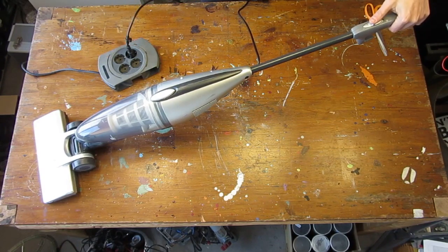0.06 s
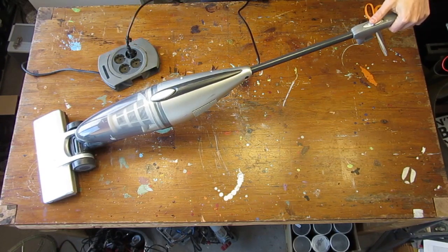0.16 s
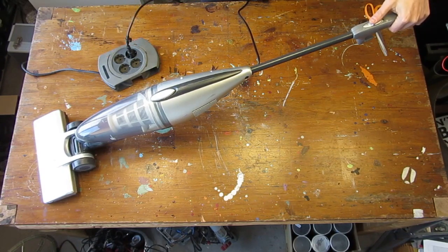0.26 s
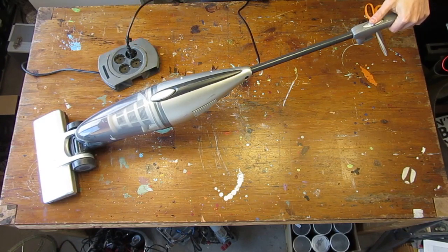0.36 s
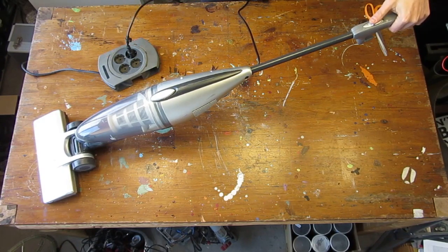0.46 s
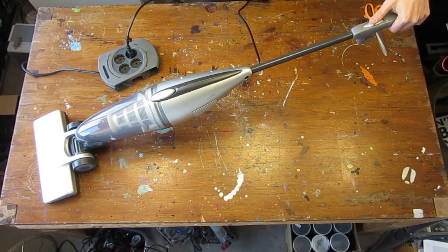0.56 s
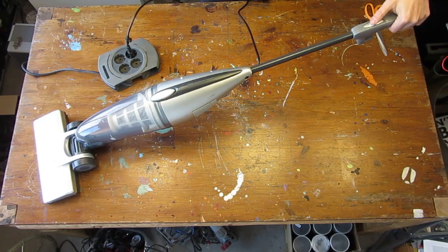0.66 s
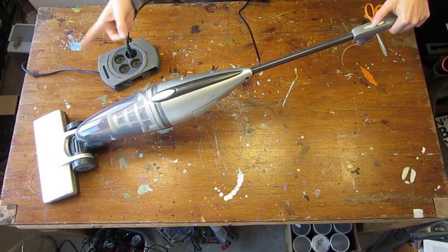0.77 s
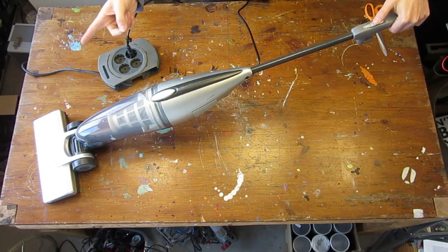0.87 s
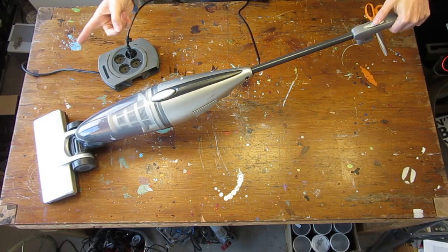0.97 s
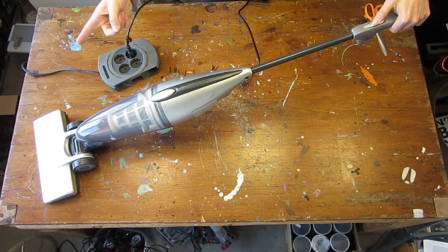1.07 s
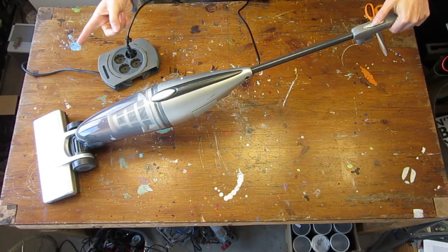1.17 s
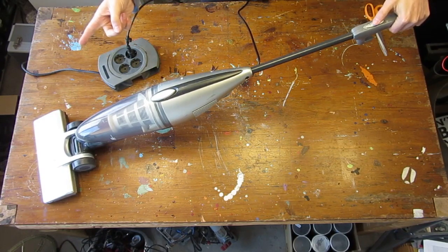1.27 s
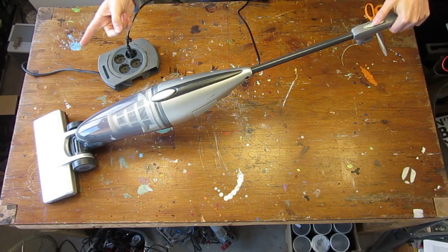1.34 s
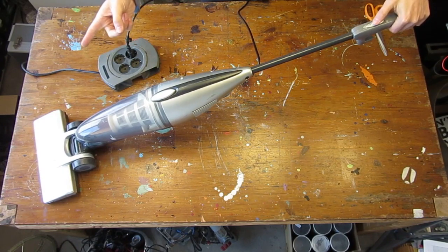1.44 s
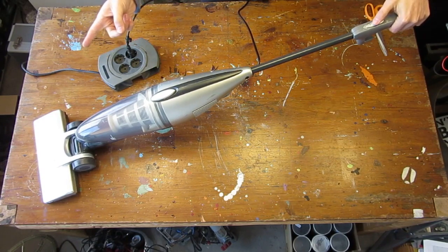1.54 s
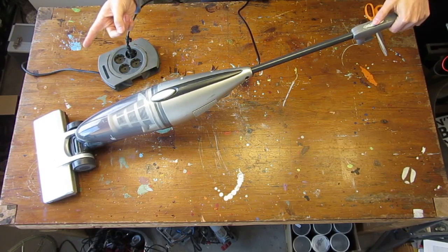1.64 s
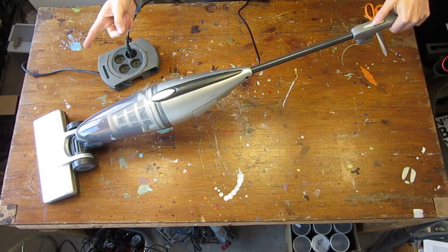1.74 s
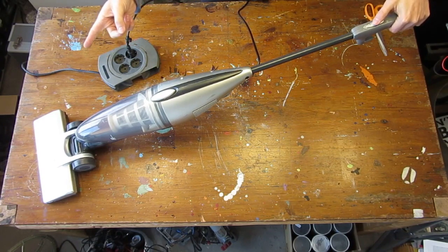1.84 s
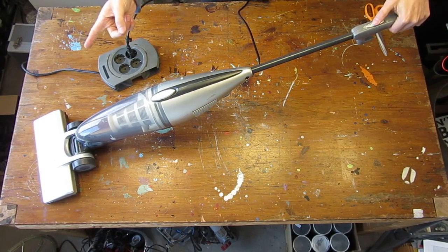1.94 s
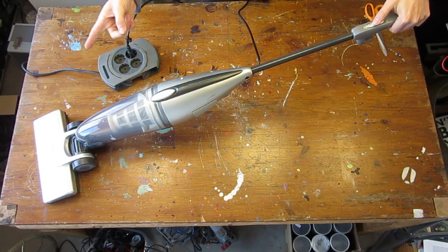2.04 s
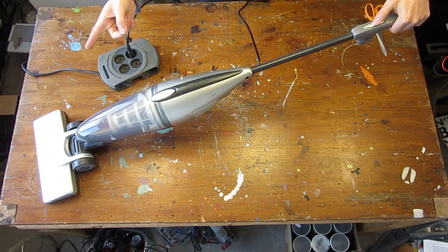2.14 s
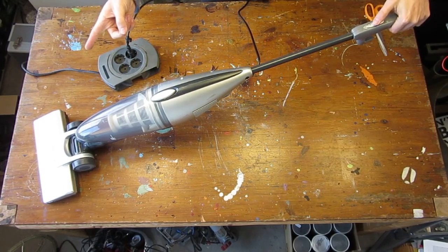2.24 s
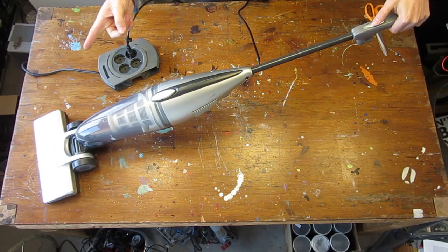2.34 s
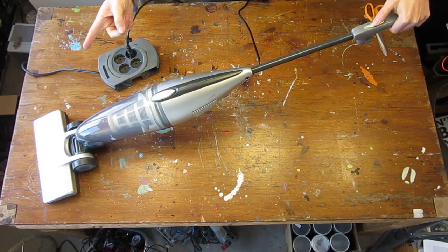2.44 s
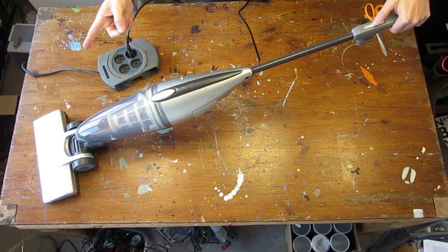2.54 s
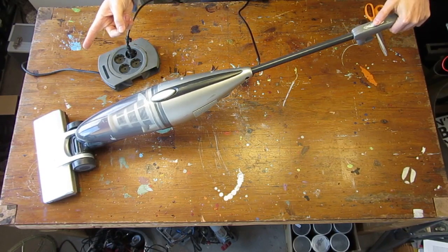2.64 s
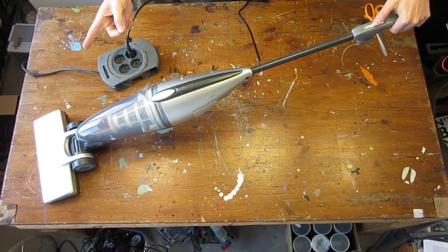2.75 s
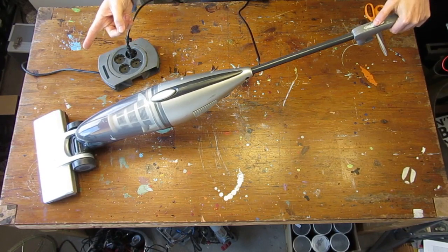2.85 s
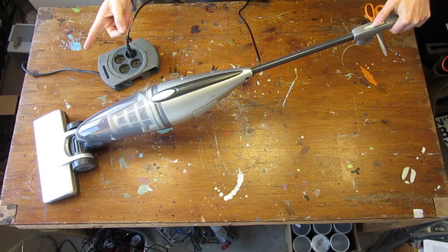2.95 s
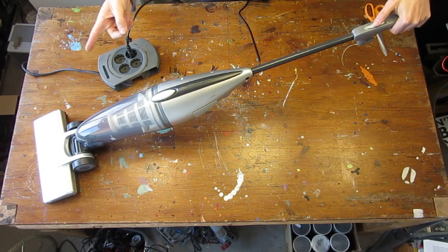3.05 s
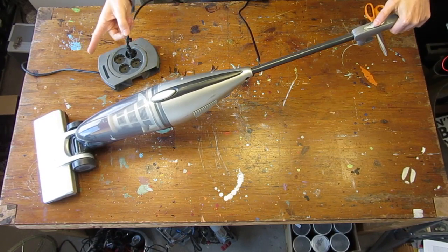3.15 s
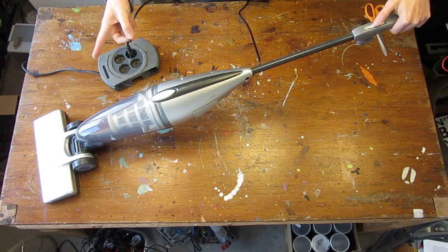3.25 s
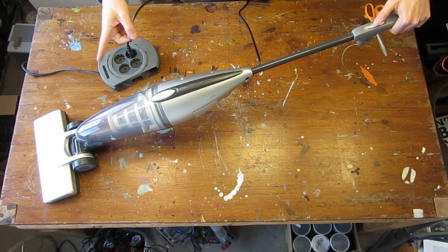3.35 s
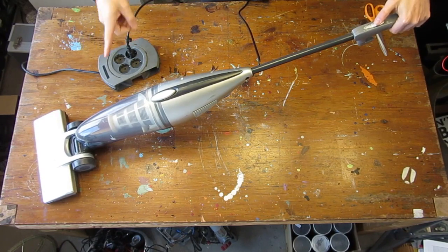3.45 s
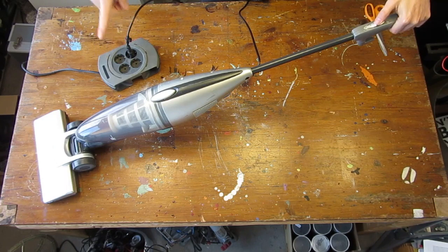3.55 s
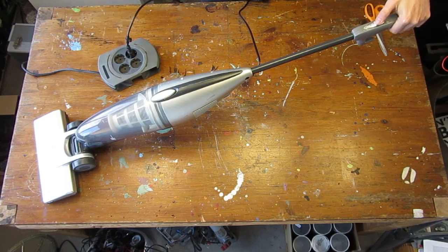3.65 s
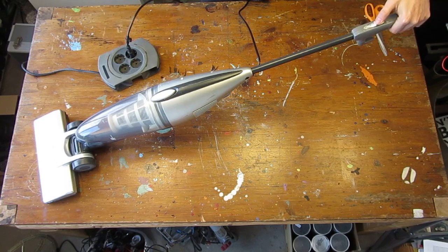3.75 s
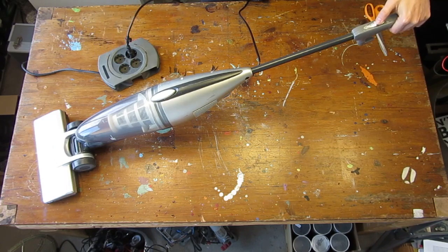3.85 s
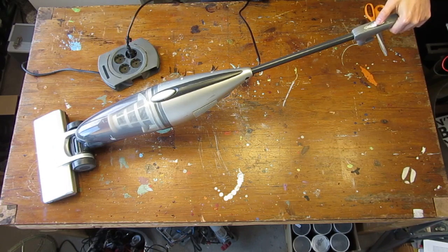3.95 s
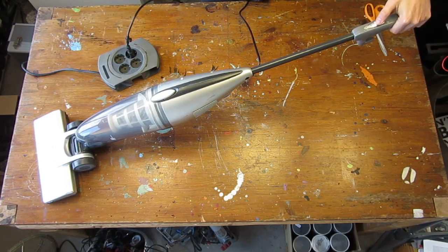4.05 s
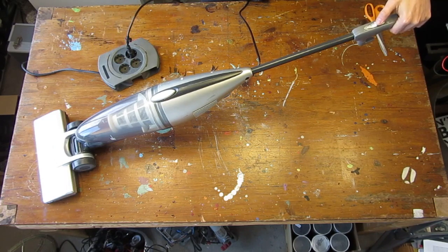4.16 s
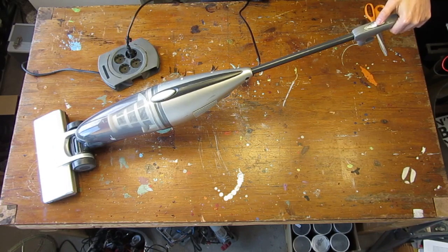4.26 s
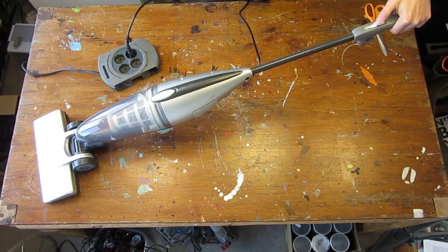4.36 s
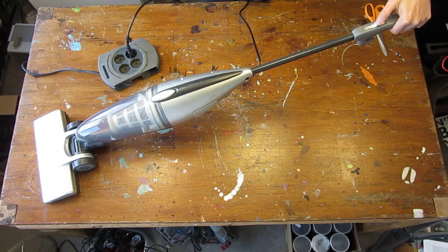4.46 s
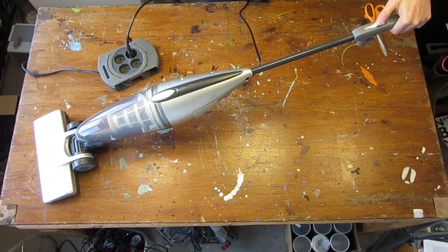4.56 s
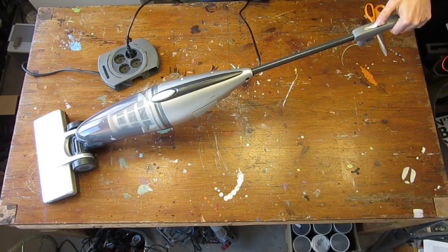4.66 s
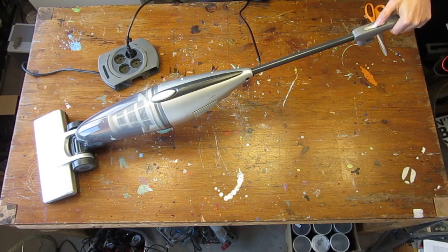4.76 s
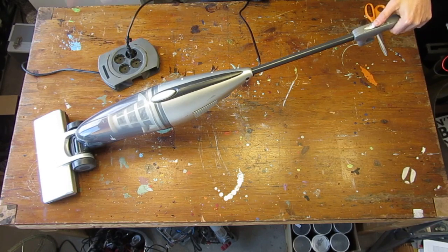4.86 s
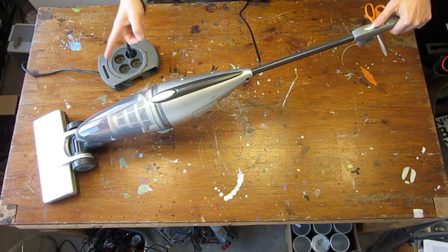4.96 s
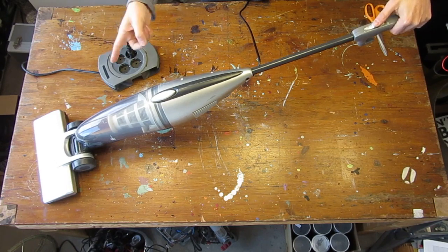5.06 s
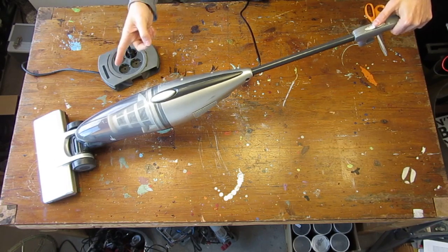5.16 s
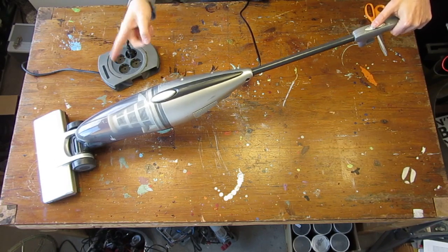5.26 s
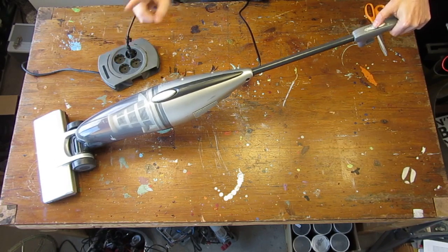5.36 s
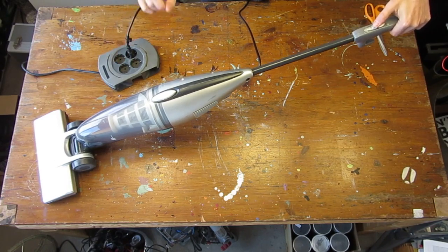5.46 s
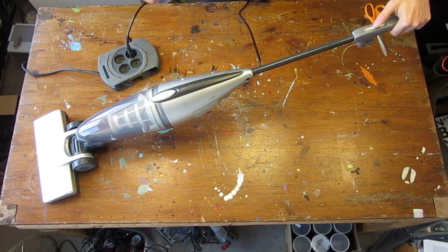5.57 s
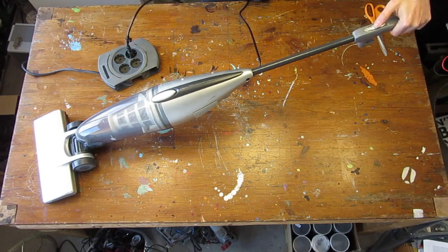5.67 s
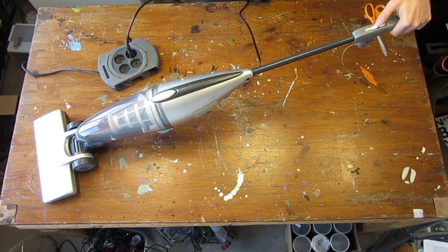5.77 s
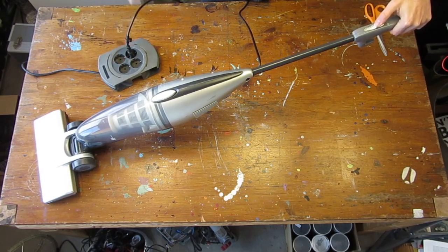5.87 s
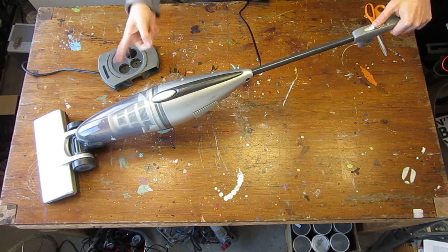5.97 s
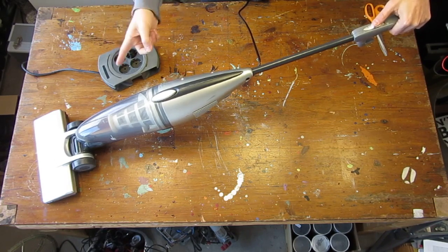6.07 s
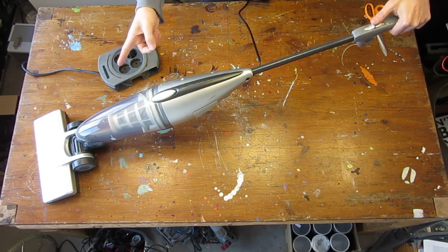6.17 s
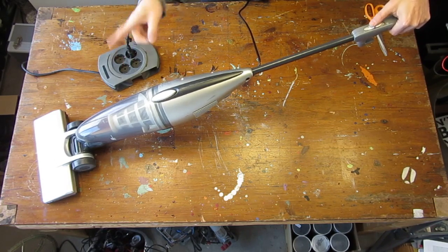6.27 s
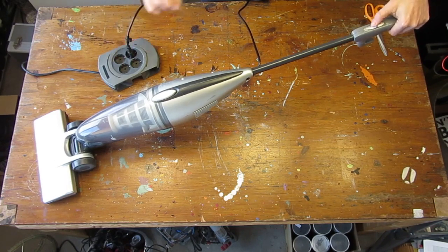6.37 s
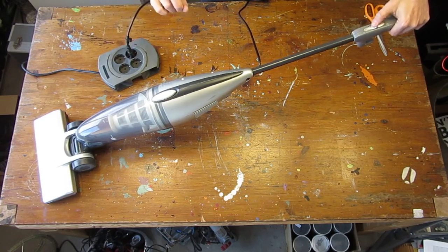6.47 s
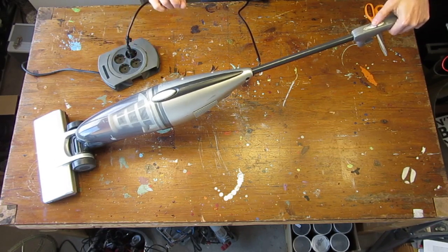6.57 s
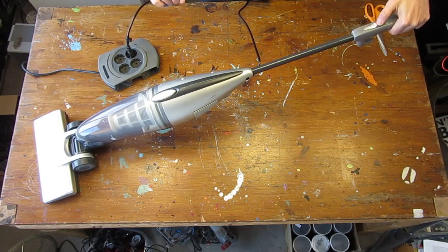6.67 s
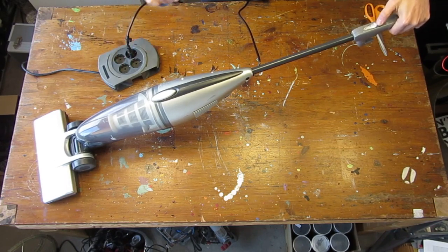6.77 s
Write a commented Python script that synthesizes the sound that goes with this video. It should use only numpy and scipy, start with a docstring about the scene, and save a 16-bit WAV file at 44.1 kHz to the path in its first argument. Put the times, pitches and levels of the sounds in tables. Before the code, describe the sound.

A small vacuum cleaner roars at full speed, clicks off and winds down into a rattle, then is switched on and off twice more.

```python
"""A stick vacuum cleaner on a wooden workbench runs at full speed, then is switched off, on, off, on, off.
Air rushes as shaped noise; the seven-bladed fan whines and the unbalanced rotor hums as sines at multiples
of its speed. Brushes hiss on the commutator, the switch snaps and the housing is jolted (noise bursts).
In the long run-down the loose bearings rattle the plastic housing; each start buzzes, sings and shudders.
A simulated rotor speed drives the motor layers; a faint squeal and a quiet workshop lie underneath."""
import sys
import numpy as np
from scipy import signal
from scipy.fft import rfft, irfft
from scipy.io import wavfile
from scipy.ndimage import uniform_filter1d, map_coordinates

SR = 44100
rng = np.random.default_rng(int(sys.argv[2]) if len(sys.argv) > 2 else 0)


def persist_wave(psi):
    """Save psi, clipped to +-1, as 16-bit WAV."""
    counts = np.round(np.clip(psi, -1, 1) * 32767).astype(np.int16)
    wavfile.write(sys.argv[1], SR, np.atleast_2d(counts).T)


N = 300321
TIME = np.arange(N) / SR
CUTOFF_HZ = 14900


def from_db(db):
    """Decibels to amplitude gain."""
    return 10 ** (np.asarray(db) / 20)


def rms_one(x):
    """Scale to an rms of 1."""
    return x / np.sqrt(np.mean(x ** 2) + 1e-20)


def noise():
    """White noise over the whole scene."""
    return rng.standard_normal(N)


def at_hz(points, hz):
    """Interpolate a table on a log-frequency axis."""
    f, value = np.transpose(points)
    return np.interp(np.log(hz + 1e-3), np.log(f), value)


def bells_db(table, hz):
    """Sum of bell-shaped peaks or dips, in dB, at a gliding frequency."""
    return sum(db * np.exp(-((hz - centre) / width) ** 2) for centre, width, db in table)


def drift(knots_per_s):
    """Smooth random curve through normal knots of spread 1."""
    knots = rng.standard_normal(4096)
    return map_coordinates(knots, [TIME * knots_per_s], order=3, mode="wrap")


def room(x, t60):
    """Dense reflections from bench and walls: decaying noise of unit energy, t60 in seconds."""
    age = np.arange(16000) / SR
    echoes = rng.standard_normal(len(age)) * from_db(-60 * age / t60)
    return signal.fftconvolve(x, echoes / np.linalg.norm(echoes))[:N]


# Left-right likeness of noise. Each row: frequency in Hz, likeness from 0 to 1.
LIKENESS_BY_HZ = [(60, 0.94), (500, 0.99), (1200, 0.97), (2500, 0.91), (6000, 0.72), (14000, 0.8)]


def colour(x, spectrum, modes=()):
    """Shape x by a broad spectrum and resonances, spread it over left and right; joint rms 1."""
    hz = np.arange(N // 2 + 1) * SR / N
    low_hz, high_hz = spectrum[0][0], spectrum[-1][0]
    low_edge = 1 + (1.3 * low_hz / (hz + 1)) ** 4
    high_edge = 1 + (hz / high_hz / 1.2) ** 10
    gain = from_db(at_hz(spectrum, hz)) / np.sqrt(low_edge * high_edge)
    gain = gain * (1 + sum(lift / (1 + (2 * (hz - f) / width) ** 2) for f, width, lift in modes))
    alike = np.clip(at_hz(LIKENESS_BY_HZ, hz), 0, 1)
    mid = irfft(rfft(rms_one(x)) * gain * np.sqrt(1 + alike), N)
    side = irfft(rfft(noise()) * gain * np.sqrt(1 - alike), N)
    return rms_one(np.array([mid + side, mid - side]))


# Plastic shell resonances. Each row: frequency in Hz, level in dB (relative; contrast is eased later).
SHELL_MODES = [(382.2, -36), (516.8, -44), (759.0, -56.5), (904.4, -79), (1017, -43), (1147, -53.5),
               (1217, -45.5), (1303, -39.5), (1410, -55.5), (1523, -50), (1750, -53), (1836, -43.5)]


def housing(lift_db, width_hz):
    """Shell resonances as (Hz, width in Hz, lift as gain); the strongest gets lift_db."""
    strongest_db = max(db for f, db in SHELL_MODES)
    return [(f, width_hz, from_db(lift_db + 0.92 * (db - strongest_db))) for f, db in SHELL_MODES]


# Top speed in turns per s, where pull balances drag.
FULL_SPEED_HZ = 642.6
# Braking: air drag at full speed, its power of speed, and steady dry friction.
AIR_DRAG_HZ_PER_S, DRAG_EXPONENT, DRY_DRAG_HZ_PER_S = 606.4, 2.0753, 34.71
# Pull at standstill over pull at full speed.
STALL_PULL_RATIO = 14.53


def rotor(power):
    """Speed in turns per s: the motor's pull fades as it speeds up, air drag and dry friction brake it."""
    step = 44
    speed, speeds = FULL_SPEED_HZ, []
    for start in range(0, N, step):
        speeds.append(speed)
        share = speed / FULL_SPEED_HZ
        pull = (AIR_DRAG_HZ_PER_S + DRY_DRAG_HZ_PER_S) * STALL_PULL_RATIO ** (1 - share)
        drag = AIR_DRAG_HZ_PER_S * share ** DRAG_EXPONENT + DRY_DRAG_HZ_PER_S
        speed += (power[start:start + step].mean() * pull - drag) * step / SR
    return np.interp(TIME, TIME[::step], speeds)


# Layer levels below are relative: the mix in scene() adds a fixed offset to each.
# Housing noise: coasting level, loss per halving of speed, rise under power, random waver.
HOUSING_DB, HOUSING_FALL_DB, HOUSING_POWER_DB, HOUSING_WAVER_DB = -29.5, 0, 3.5, .5
# Brush hiss: coasting at full speed, loss per halving, loss per halving squared, rise under power.
BRUSH_DB, BRUSH_FALL_DB, BRUSH_BEND_DB, BRUSH_POWER_DB = -30.5, 3.5, 1.37, 3.5
LOAD_LAG_S = 0.022
# The coasting shaft comes loose in its bearings below this speed, over this range.
LOOSE_HZ, LOOSE_RANGE_HZ = 302, 5.0
# Rattle: level on coming loose, loss per ms that a turn grows longer.
RATTLE_DB, RATTLE_FALL_DB_PER_MS = -24, 3
# Harder first shaking: extra level, loss of speed over which it settles.
FIRST_SHAKE_DB, SETTLE_HZ = 3.5, 22


def friction(speed, power):
    """Housing and brush levels in dB follow speed and load, until the coasting shaft rattles loose."""
    halvings = np.log2(FULL_SPEED_HZ / speed)
    keep = np.exp(-1 / (LOAD_LAG_S * SR))
    load = 1 - signal.lfilter([1 - keep], [1, -keep], 1 - power)
    tight_db = HOUSING_DB - HOUSING_FALL_DB * halvings + HOUSING_POWER_DB * load
    longer_ms = 1000 * (1 / speed - 1 / LOOSE_HZ)
    first_shake_db = FIRST_SHAKE_DB * np.exp(-np.abs(LOOSE_HZ - speed) / SETTLE_HZ)
    loose_db = RATTLE_DB - RATTLE_FALL_DB_PER_MS * longer_ms + first_shake_db
    loose = (1 - load) * (1 + np.tanh((LOOSE_HZ - speed) / LOOSE_RANGE_HZ)) / 2
    housing_db = tight_db + loose * (loose_db - tight_db) + HOUSING_WAVER_DB * drift(18)
    brush_db = BRUSH_DB - BRUSH_FALL_DB * halvings - BRUSH_BEND_DB * halvings ** 2 + BRUSH_POWER_DB * load
    return housing_db, brush_db


# Airflow inside the housing. Each row: frequency in Hz, relative level in dB per Hz.
AIR_SPECTRUM = [(30, -7), (60, -27), (95, -15), (130, -10.5), (200, 1), (265, 5), (320, -7.5), (450, 1.5),
                (750, 7.5), (880, 1.5), (1250, 7), (1550, 6.5), (1900, 5), (2200, -2.5), (3300, -10.5),
                (6000, -10)]
# Jet from the vents. Each row: frequency in Hz, relative level in dB per Hz.
JET_SPECTRUM = [(1350, -59), (2300, -8), (2630, -3), (4170, -9.5), (4340, -2), (4650, -5.5), (4800, -9),
                (5480, -6), (8500, 1), (8700, -3.5), (9190, -1.5), (9410, -2.5), (13800, -13.5),
                (14900, -26)]


def airflow():
    """Turbulence inside the housing and the bright jet from its vents, combed by nearby reflections."""
    air = colour(noise(), AIR_SPECTRUM, housing(lift_db=16.0, width_hz=28.7))
    hiss = noise()
    combed = hiss + .35 * room(hiss, t60=.06)
    jet = colour(combed, JET_SPECTRUM)
    return air, jet * from_db(0.91 * drift(30))


# Rotor orders. Each row: multiple of rotor speed, full-speed level in dB before the casing's lift,
# loss in dB per halving of speed.
ROTOR_ORDERS = [(2, -36, 20), (6, -42.5, 18), (7, -34.3, 1), (11, -53, 8), (12, -39.5, 7), (13, -49, 8),
                (14, -35, 18), (17, -54, 10), (21, -58, 0), (24, -53.5, -5)]
# Fan casing peaks and a dip. Each row: centre in Hz, half width in Hz, lift in dB.
CASING_PEAKS = [(2700, 130, 4), (3750, 380, -3.5), (5050, 330, 5), (6430, 150, 7), (8800, 500, 9),
                (9400, 150, 6)]
BLADES = 7
# Extra level of the orders above the blade tone while speeding up.
PULL_WHINE_DB = 3.5


def whine(turns, speed, power):
    """Blade and commutator tones; in a glide they flutter and their echoes trail off pitch."""
    halvings = np.log2(speed.max() / speed)
    gliding = np.clip(halvings * 25, 0, 1)
    # at low speed the fan barely moves air: only a faint blade tone stays
    fast = 1 / (1 + (240 / speed) ** 8)
    faint = np.minimum(speed / 520, .3)
    pull_db = PULL_WHINE_DB * gliding * uniform_filter1d(power.astype(float), size=900)
    x = 0
    for multiple, db, fall_db in ROTOR_ORDERS:
        flutter_db = (1 + 2.2 * gliding) * drift(30)
        lift_db = bells_db(CASING_PEAKS, multiple * speed) + pull_db * (multiple > BLADES)
        alive = np.maximum(fast, faint * (multiple == BLADES))
        gain = alive * from_db(db - fall_db * halvings + lift_db + flutter_db)
        x = x + gain * np.sin(2 * np.pi * multiple * turns)
    x = np.sqrt(2) * x
    mid = room(x * gliding, t60=0.19)
    side = 0.29 * room(x * gliding, t60=0.19)
    trail = mid + side * np.array([[1], [-1]])
    return x * from_db(-5 * gliding) + from_db(-7.5) * trail


# Bench response to the unbalance. Each row: rotor speed in Hz, rms level in dB before dips and load.
BENCH_RESPONSE = [(77, -70), (83, -57), (104, -61), (116, -66), (142, -55), (160, -57), (176, -43),
                  (200, -32), (235, -32), (260, -24), (320, -33), (350, -31), (395, -21.5), (452, -22),
                  (495, -14.5), (545, -18), (580, -14.3), (645, -15.2)]
# Standing-wave dips. Each row: centre in Hz, half width in Hz, depth in dB under full pull
# (up to 1.5 times deeper when coasting).
STANDING_WAVE_DIPS = [(187, 5, -8), (225, 8, -9), (299, 6, -5), (363, 6, -8), (422, 12, -6), (473, 11, -7),
                      (519, 6, -12), (566, 22, -.6), (625, 9, -3)]
# Time the standing waves need to build up.
DIP_LAG_S = .011
# Below this speed a start sweeps too fast for the bench to ring; hum lost at standstill.
SWEEP_SPEED_HZ, SWEEP_LOSS_DB = 450, 42


def hum(turns, speed, power):
    """The once-a-turn unbalance swells and sinks as it glides through standing waves."""
    dips_db = bells_db(STANDING_WAVE_DIPS, np.interp(TIME - DIP_LAG_S, TIME, speed))
    # a pulling motor shakes harder and sweeps too quickly for the dips to form fully
    pulling = uniform_filter1d(power * np.clip(8 * (1 - speed / speed.max()), 0, 1), size=1500)
    level_db = at_hz(BENCH_RESPONSE, speed) + dips_db * (1.5 - .5 * pulling)
    level_db = level_db + 3.0 * pulling + 0.99 * drift(8.7)
    sweep_db = -SWEEP_LOSS_DB * pulling * np.clip(1 - speed / SWEEP_SPEED_HZ, 0, 1)
    lead_rad = 0.055 * np.array([[1], [-1]])  # left and right slightly out of step
    return from_db(level_db + sweep_db) * np.sqrt(2) * np.sin(2 * np.pi * turns + lead_rad)


def rubbing(turns, speed, repeat, bar_db, uneven_db, count):
    """Noise plus bumps that return every turn; bar_db stresses multiples of the 12 commutator bars."""
    orders = np.arange(2, count)
    strength = from_db(uneven_db * rng.standard_normal(len(orders)) + bar_db * (orders % 12 == 0))
    strength /= np.sqrt(np.mean(strength ** 2))
    phases = rng.uniform(0, 2 * np.pi, len(orders))
    angle = (2 * np.pi * (turns % 1)).astype(np.float32)
    octaves = np.log2(speed).astype(np.float32)
    bumps = np.zeros(N)
    for k, gain, phase in zip(orders.tolist(), strength.tolist(), phases.tolist()):
        # each order swells and fades at its own random pace as the speed changes
        swell = 1 + np.sin(octaves * rng.uniform(15, 50) + rng.uniform(0, 2 * np.pi))
        bumps += gain * swell * np.sin(k * angle + phase) * (k * speed < CUTOFF_HZ)
    bumps *= np.sqrt(4 * speed / SR)
    # the shaft presses harder once a turn
    beat = from_db(4.7 * np.cos(angle) + 2.6 * drift(60))
    x = beat * (repeat * bumps + noise())
    return 0.54 * x + room(x, t60=0.39)


# Brush hiss. Each row: frequency in Hz, relative level in dB per Hz.
BRUSH_SPECTRUM = [(1760, -36), (3000, -64), (3140, -9), (4310, -8.5), (4900, -2), (6030, -6.5), (6810, 0),
                  (7430, -10), (8440, -3), (9400, 0.5), (11500, -8.5), (13900, -11), (14900, -24)]


def brush_hiss(turns, speed):
    """Brushes rub on the commutator: bar-stressed bumps and noise, coloured bright."""
    commutator = rubbing(turns, speed, repeat=1.6, bar_db=6, uneven_db=2, count=170)
    return colour(commutator, BRUSH_SPECTRUM) * from_db(.6 * drift(16))


# Bearing rattle. Each row: frequency in Hz, relative level in dB per Hz.
RATTLE_SPECTRUM = [(70, -51), (110, -30), (190, -7), (320, -7), (400, -0.5), (520, -5.5), (640, -14),
                   (770, -3), (900, -17), (1100, -6), (1500, -5.5), (1850, -14.5), (2250, -30.5),
                   (3200, -33.5)]
# Soft knocking below this speed: low-pass cut and gain of what it passes.
SOFT_SPEED_HZ, SOFT_CUT_HZ, SOFT_DB = 120, 365, 6.5


def bearing_rattle(turns, speed):
    """Bearings shake the shell's resonances; a slow shaft knocks more softly, so the rattle grows dull."""
    bearings = rubbing(turns, speed, repeat=.4, bar_db=0, uneven_db=2, count=24)
    rattle = colour(bearings, RATTLE_SPECTRUM, housing(lift_db=3, width_hz=24))
    soft = 1 / (1 + (speed / SOFT_SPEED_HZ) ** 4)
    dull = signal.sosfilt(signal.butter(1, SOFT_CUT_HZ, fs=SR, output="sos"), rattle)
    return (1 - soft) * rattle + soft * from_db(SOFT_DB) * dull


# Faint ball-bearing squeal in the long run-down, swelling and then fading.
# Each row: time in seconds, rms level in dB (the first level holds from the start, the last to the end).
SQUEAL_LEVEL = [(2.8, -49), (2.92, -43.5), (3.25, -43.5), (3.42, -48), (3.6, -62)]


def squeal():
    """A ball bearing squeals faintly: a noise band around 7.5 kHz."""
    seconds, level_db = np.transpose(SQUEAL_LEVEL)
    band = colour(noise(), [(6800, -23), (7550, 11), (8300, -7)])
    return from_db(np.interp(TIME, seconds, level_db)) * band


# Quiet workshop. Each row: frequency in Hz, relative level in dB per Hz.
FLOOR_SPECTRUM = [(20, -2), (50, -26), (120, 17.5), (450, 23.5), (1500, -65), (3000, -64), (9000, 4),
                  (14000, -1)]


def workshop_floor():
    """Steady coloured noise of the quiet workshop."""
    return from_db(-54.5) * colour(noise(), FLOOR_SPECTRUM)


# Switch snaps and housing jolts. Each row: time in seconds, then relative levels in dB of
# crack, body and snap (offsets follow), t60 in seconds.
KNOCK_EVENTS = [(0.841, -16, -21, -21.5, 0.39), (2.526, -28, -17, -53, 0.12), (4.892, -4, -30, -49.5, 0.44),
                (4.982, -6, -21, -54, 0.12), (4.997, -11, -42, -26.5, 0.092),
                (5.016, -13, -2.5, -29.5, 0.37), (5.462, -4, -11.5, -22.5, 0.33),
                (6.053, -8, -10.5, -21, 0.17), (6.497, -3, -15, -20.5, 0.19)]
# Dull shell. Each row: frequency in Hz, relative level in dB per Hz.
BODY_SPECTRUM = [(60, -30), (150, -14), (400, 8), (800, 8.5), (1400, 11.5), (2200, 6.5), (4000, -14)]
# Bright switch. Each row: frequency in Hz, relative level in dB per Hz.
SNAP_SPECTRUM = [(1000, 21.5), (2500, 11), (5000, 7), (9000, 9), (14000, -8)]


def knocks():
    """Each knock is a dull thud of the shell and a bright snap, dying away in the workshop."""
    body, snap = np.zeros(N), np.zeros(N)
    for s, crack_db, body_db, snap_db, t60 in KNOCK_EVENTS:
        age = np.maximum(TIME - s, 0)
        decay = (TIME >= s) * from_db(-60 * age / max(t60, .01))
        crack = (TIME >= s) * from_db(crack_db - 32) * np.exp(-age / 0.00096)
        body += from_db(body_db - 15.5) * decay
        snap += from_db(snap_db + 3) * decay + crack
    return body * colour(noise(), BODY_SPECTRUM) + snap * colour(noise(), SNAP_SPECTRUM)


# Motor frame's response to the commutator tone under load. Each row: frequency in Hz, relative gain in dB.
FRAME_RESPONSE = [(3300, -21), (3800, 2), (4300, 5.5), (4650, -26), (5100, -3), (5600, -12), (6300, 2)]
# Delay of the frame's shudder after the current.
SHUDDER_LAG_S = .006


def surge(turns, speed, power):
    """A slow rotor draws heavy current: iron buzzes at twice the mains rate, the commutator sings."""
    current = power * np.clip(1 - speed / speed.max(), 0, 1)
    mains = 2 * np.pi * 50 * TIME
    buzz = (from_db(-39) * current + from_db(-53.5) * power) * np.sin(2 * mains)
    bars = np.sin(2 * np.pi * 12 * turns + 1.2 * drift(350))
    singing_gain = from_db(-15) * current * from_db(at_hz(FRAME_RESPONSE, 12 * speed))
    singing = singing_gain * np.abs(np.sin(mains)) * bars
    late_current = np.interp(TIME - SHUDDER_LAG_S, TIME, current)
    rumble = colour(noise(), [(45, -22), (85, 8.5), (200, -15), (600, 3.0)])
    shudder = from_db(-16.5) * late_current ** 2 * rumble
    return buzz + 0.31 * singing + 1.13 * room(singing, t60=0.25) + shudder


# Power on. Each row: start in seconds, end in seconds.
POWER_SPANS = [(-1, .8428), (5.0071, 5.4543), (6.059, 6.483)]


def scene():
    """Rotor speed drives the motor layers: air leads when it is fast, rubbing when it is slow."""
    power = sum((TIME > on) & (TIME < off) for on, off in POWER_SPANS)
    speed = rotor(power)
    turns = np.cumsum(speed * (1 + .0001 * drift(20))) / SR
    housing_db, brush_db = friction(speed, power)
    airy = 1 / (1 + (390 / speed) ** 6)
    air, jet = airflow()
    flow = np.sqrt(airy) * (from_db(housing_db + 3.0) * air + from_db(brush_db + 1.86) * jet)
    tones = whine(turns, speed, power) + hum(turns, speed, power) + surge(turns, speed, power)
    brush = from_db(brush_db - 2.0) * brush_hiss(turns, speed)
    rattle = from_db(housing_db + 2.0) * bearing_rattle(turns, speed)
    rub = np.sqrt(1 - airy) * (rattle + brush)
    return flow + tones + rub + squeal() + workshop_floor() + knocks()


def record(dry):
    """A steep elliptic low-pass cuts the top."""
    return signal.sosfilt(signal.ellip(12, .1, 90, CUTOFF_HZ, fs=SR, output="sos"), dry)


dry = scene()
out = record(dry)
persist_wave(out)
```